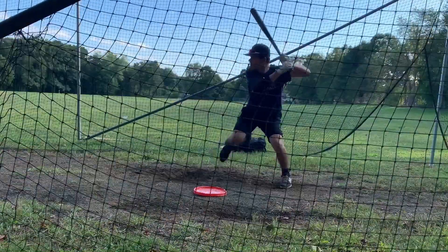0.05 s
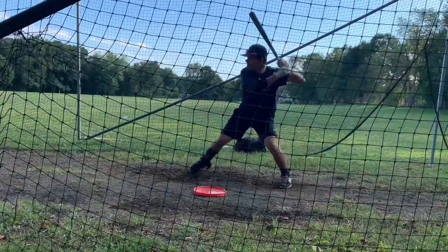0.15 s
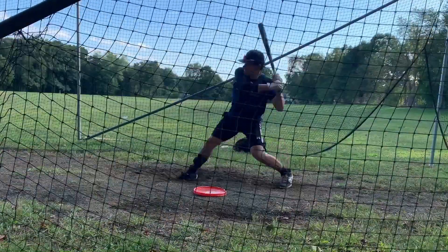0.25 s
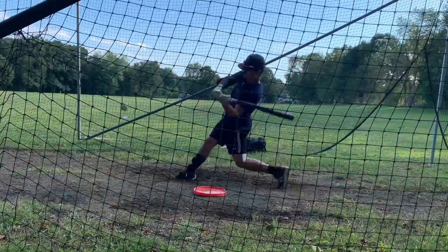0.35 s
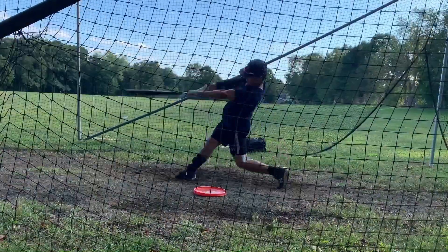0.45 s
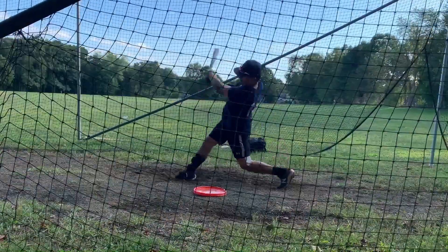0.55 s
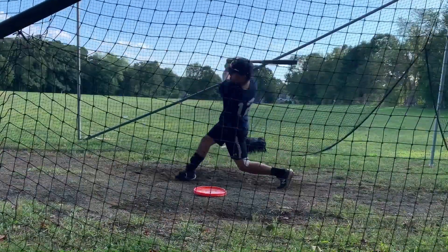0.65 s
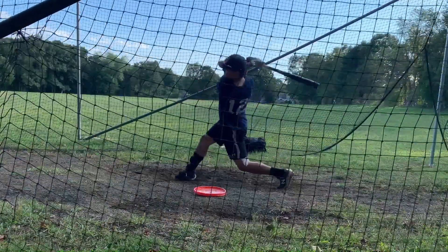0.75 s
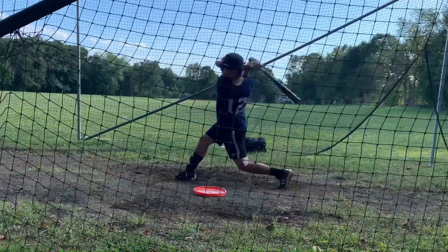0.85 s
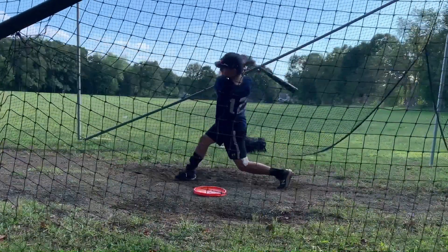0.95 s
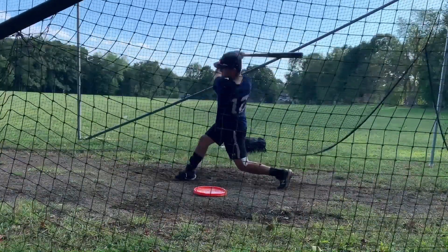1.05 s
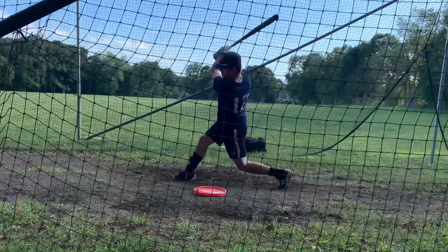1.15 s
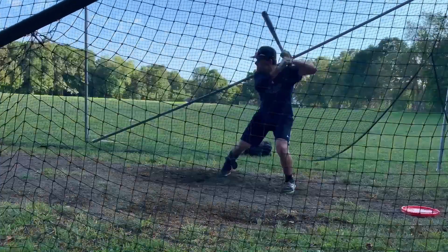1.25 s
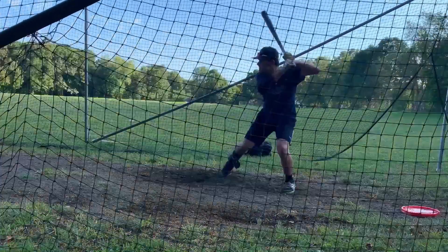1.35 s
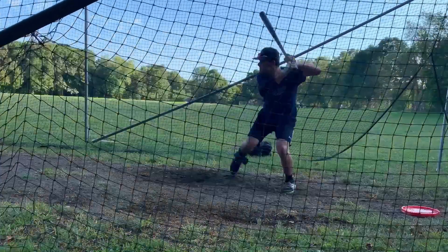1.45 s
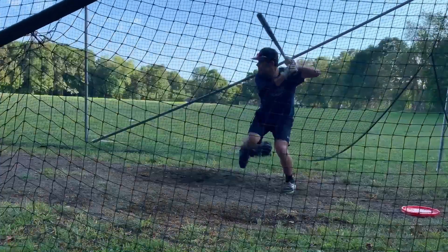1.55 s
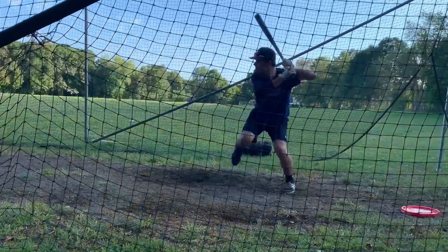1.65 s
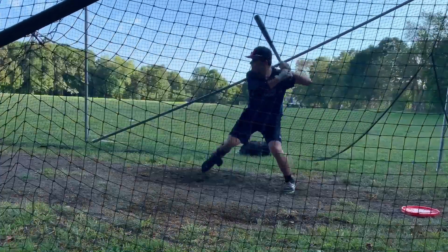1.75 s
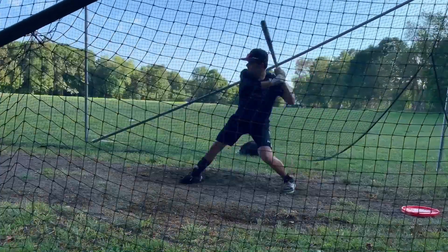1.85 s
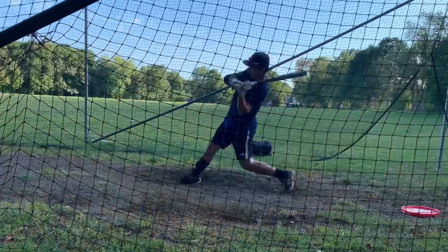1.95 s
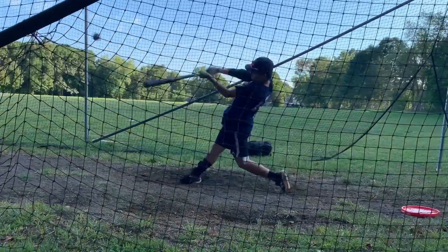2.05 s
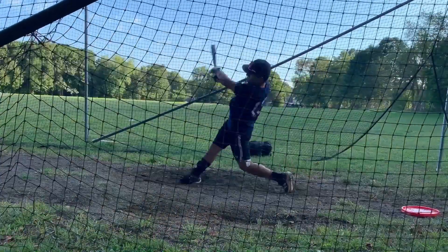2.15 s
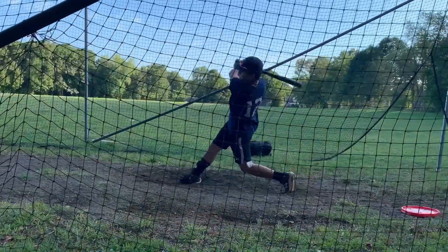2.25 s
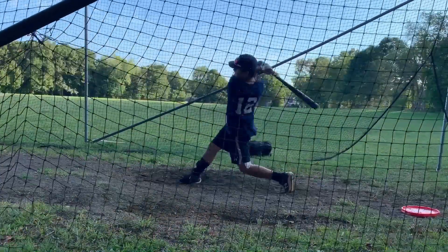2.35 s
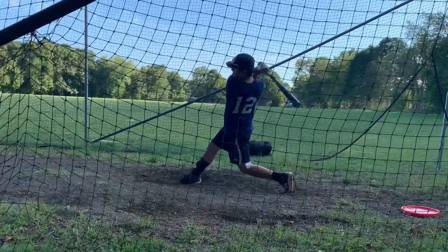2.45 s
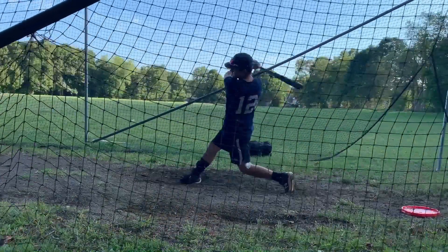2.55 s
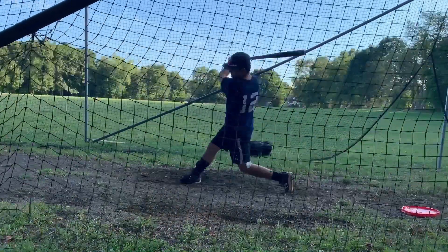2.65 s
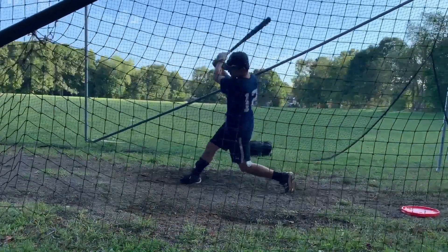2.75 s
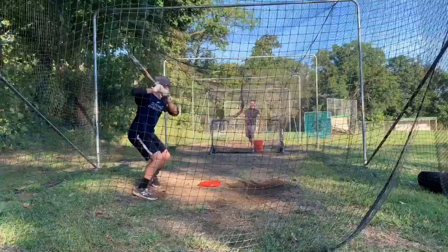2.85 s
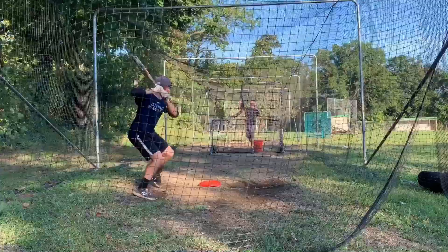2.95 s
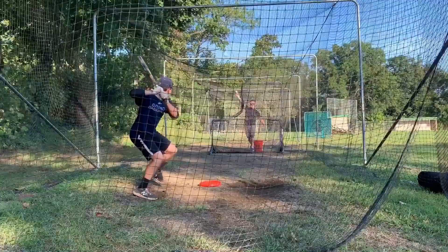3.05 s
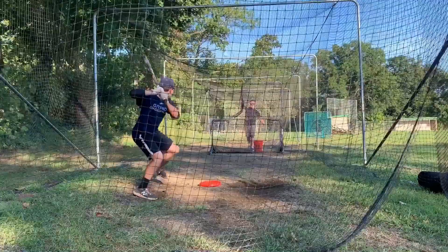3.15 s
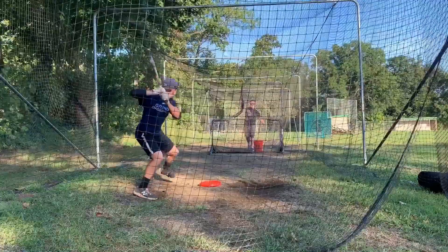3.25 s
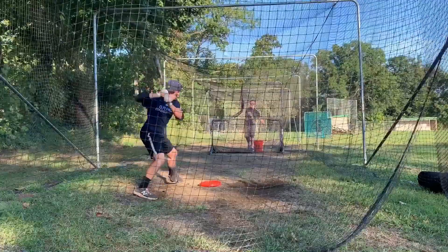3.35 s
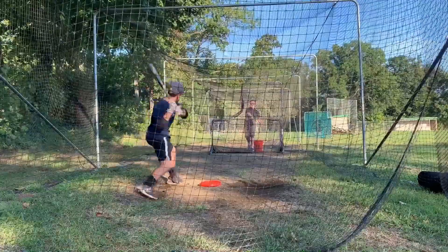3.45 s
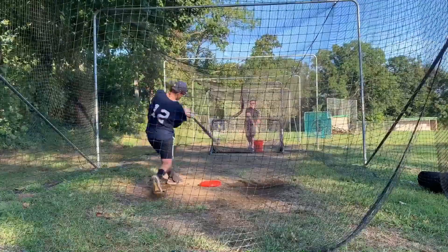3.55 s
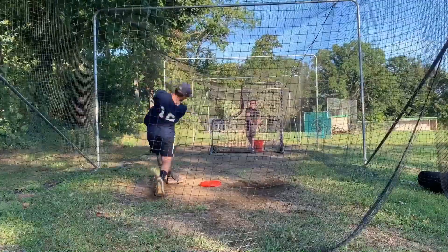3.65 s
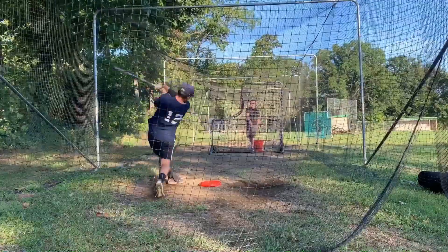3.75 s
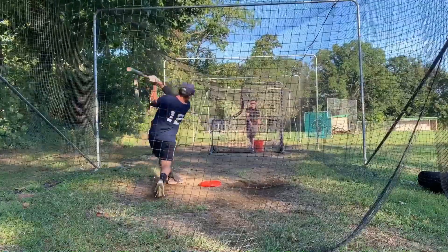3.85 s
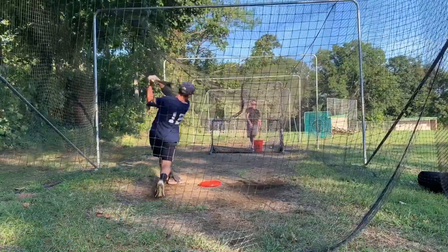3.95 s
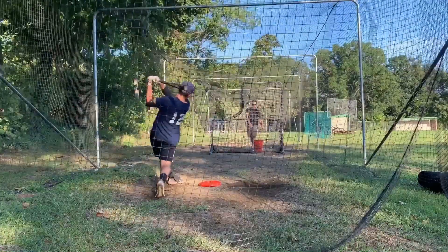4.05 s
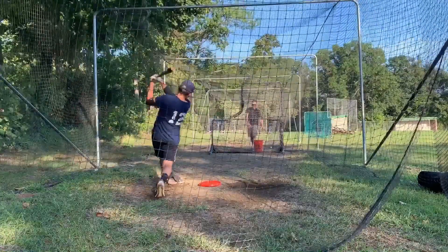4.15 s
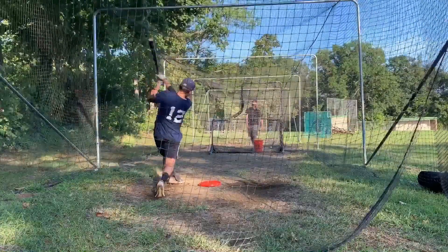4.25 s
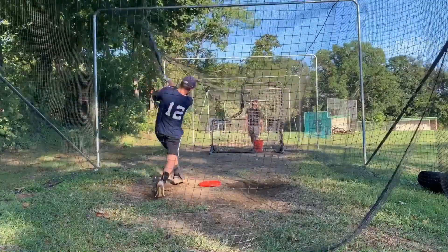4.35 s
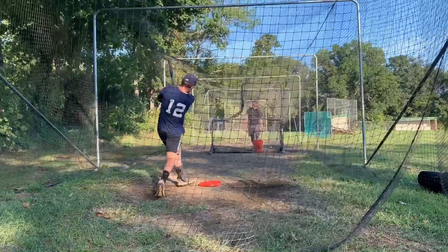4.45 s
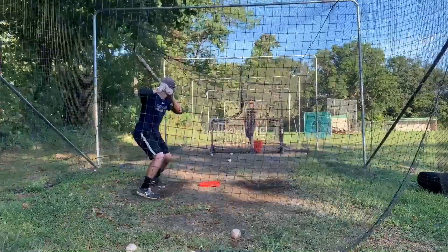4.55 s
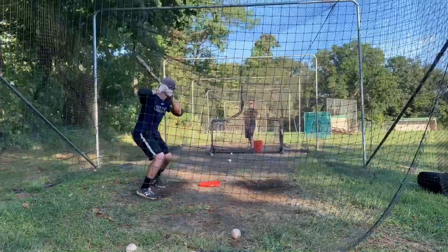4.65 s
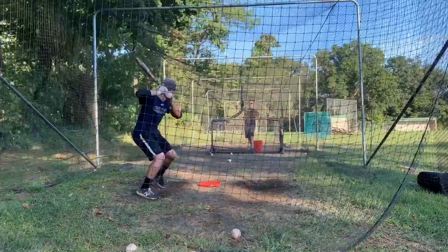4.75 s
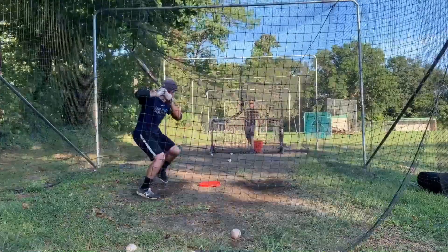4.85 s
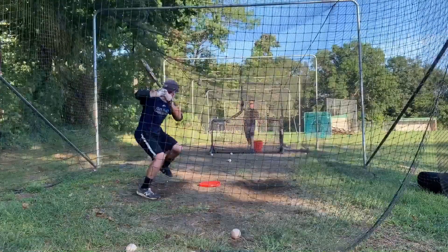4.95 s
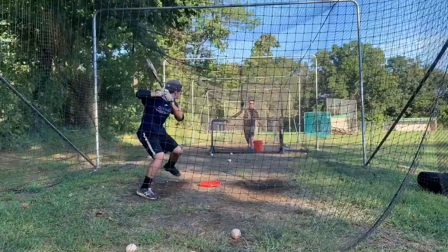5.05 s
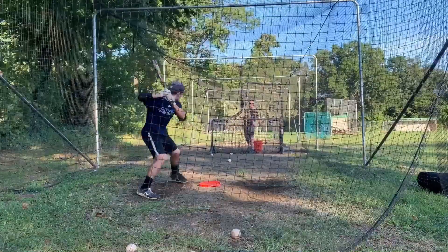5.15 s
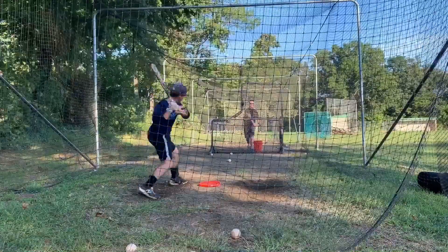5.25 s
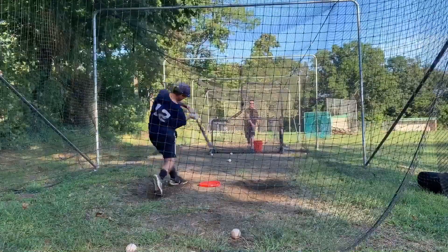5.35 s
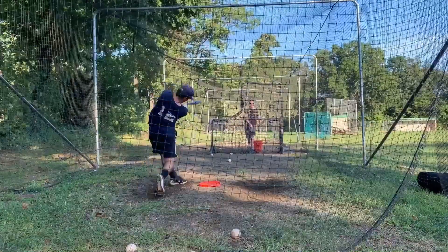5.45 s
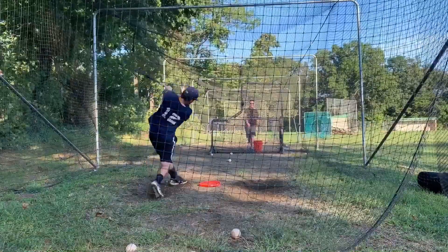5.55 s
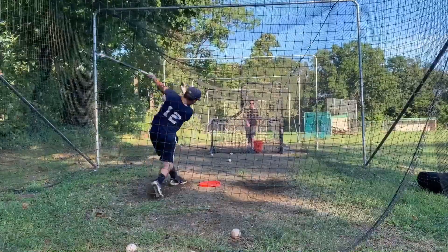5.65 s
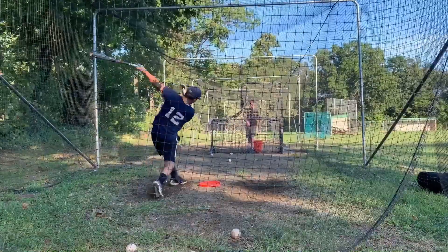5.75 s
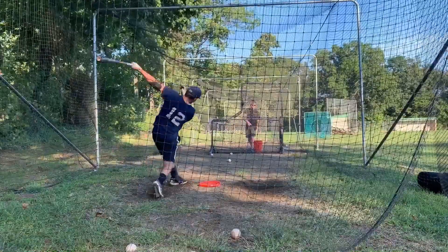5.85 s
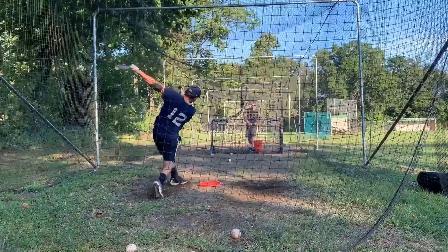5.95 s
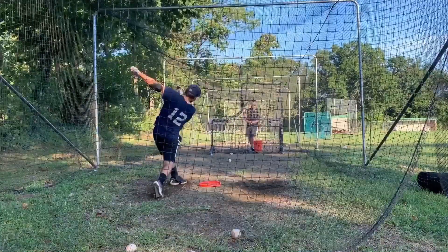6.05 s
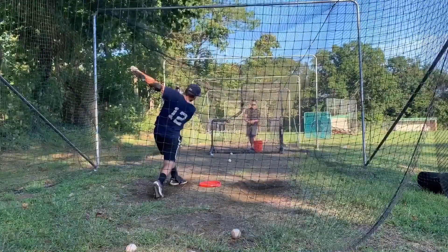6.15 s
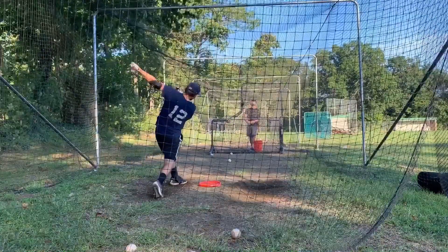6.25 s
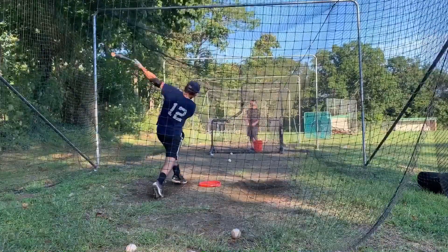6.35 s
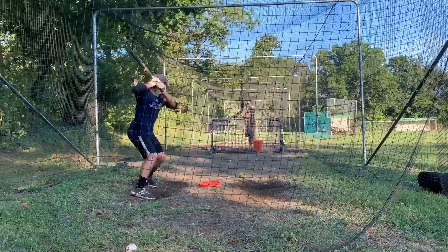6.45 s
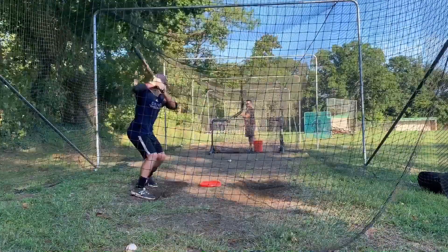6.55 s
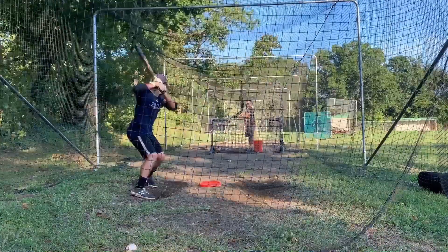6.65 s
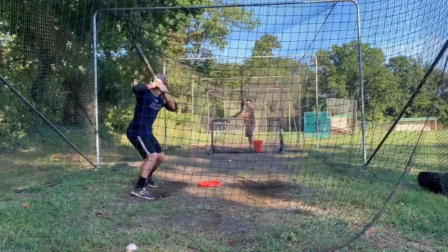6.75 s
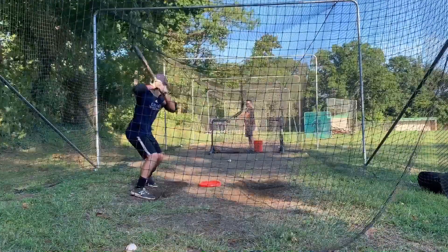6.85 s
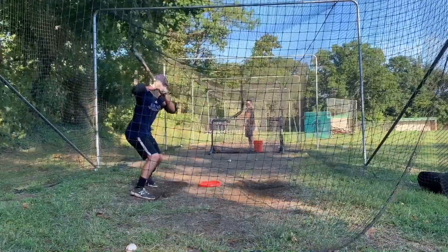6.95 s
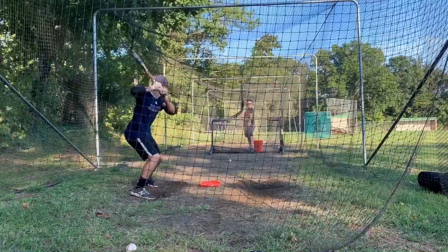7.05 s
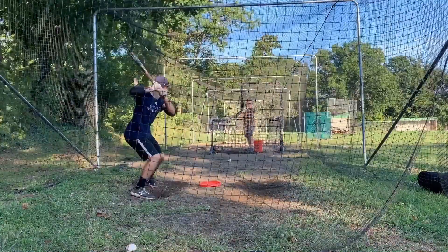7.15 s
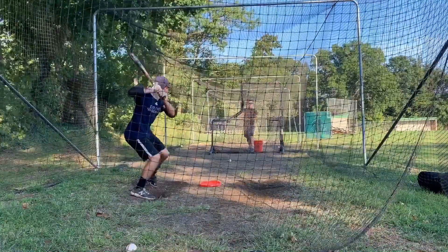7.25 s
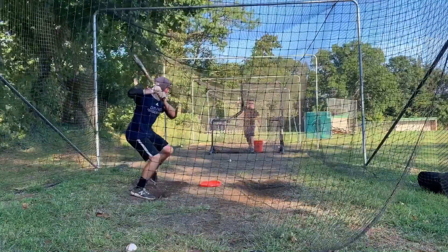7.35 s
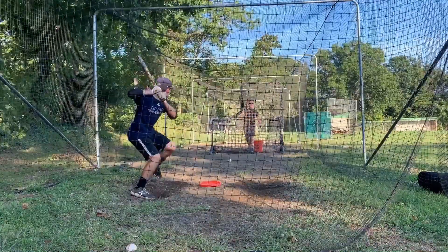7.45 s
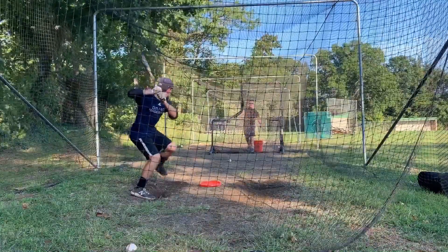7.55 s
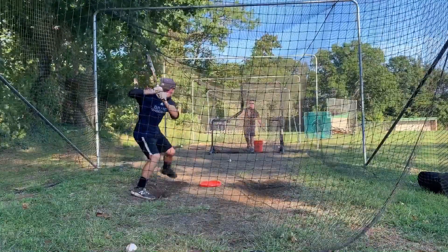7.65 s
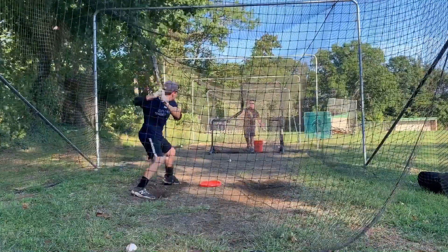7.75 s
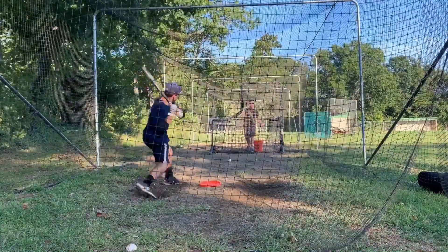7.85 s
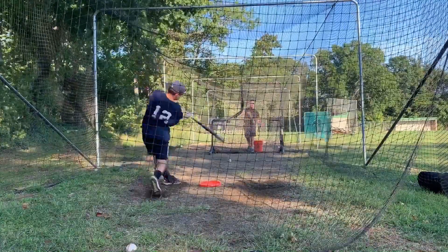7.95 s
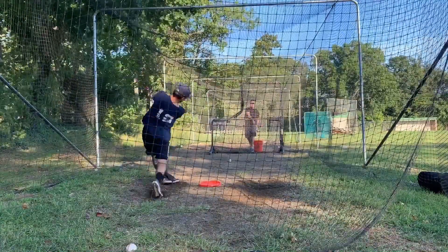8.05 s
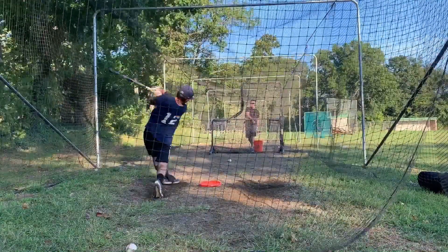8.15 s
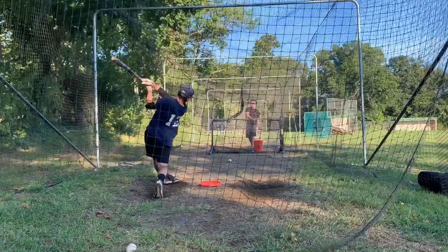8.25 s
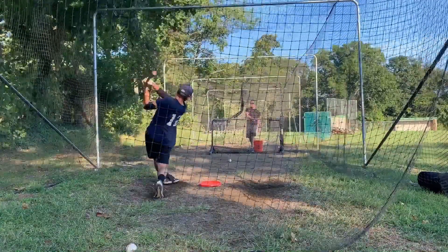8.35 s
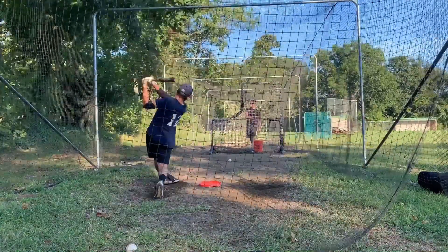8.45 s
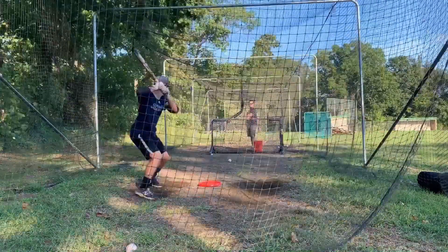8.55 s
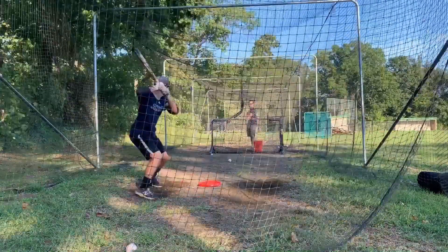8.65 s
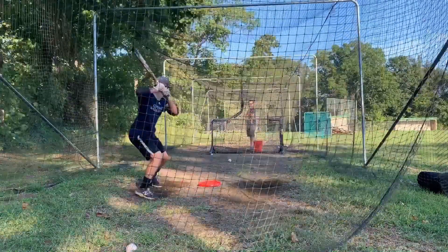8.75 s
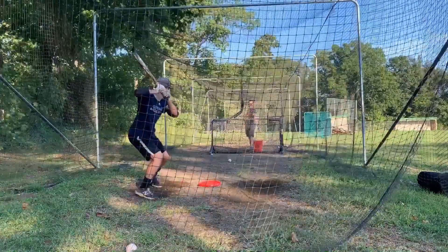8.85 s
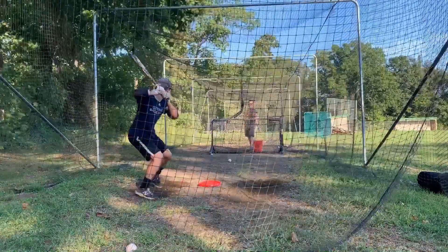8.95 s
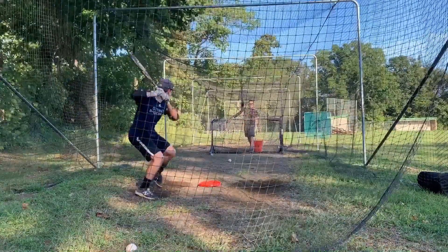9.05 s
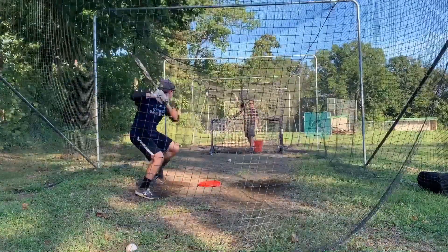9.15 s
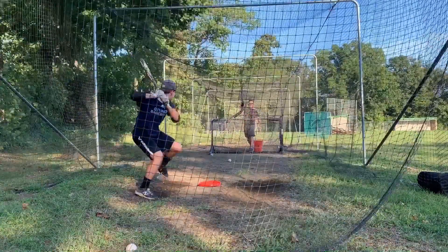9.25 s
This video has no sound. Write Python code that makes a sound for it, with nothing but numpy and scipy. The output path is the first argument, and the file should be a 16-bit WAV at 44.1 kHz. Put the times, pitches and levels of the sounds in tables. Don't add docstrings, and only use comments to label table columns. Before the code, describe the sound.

An open-air batting cage over about 9.3 seconds, with low far traffic, a wavering engine drone, thin high insects and soft leaves. Shoes grind dirt and land at 0.2 s, then a very loud, sharp bat crack hits at 0.4 s with a faint swish; the net slaps and the metal frame tinkles at 0.6 s. The ambience steps at 1.2 s. Heels thud near 1.9 s, the second crack comes at 2.0 s, then net slaps and squeaky rubber chirps around 2.5 s. More scuffs lead to cracks at 3.6 s and 5.4 s, the latter loudest, followed by net slaps at 3.9 s and 5.6 s. A quieter wait runs from 6.4 s until steps at 7.8 s and a fuller, ringing crack at 7.95 s. Each blow trails cord rattle and tree echoes. Leaf hiss rises from 8.5 s. Stereo microphones duck after blows.

```python
import sys
import numpy as np
from scipy import signal
from scipy.fft import rfft, irfft, next_fast_len
from scipy.io import wavfile
from scipy.ndimage import uniform_filter1d

SR = 44100
rng = np.random.default_rng(int(sys.argv[2]) if len(sys.argv) > 2 else 0)


def dump_mix(stems):
    frames = np.atleast_2d(stems).T
    limited = np.clip(frames, -1, 1)
    pcm = np.round(limited * 32767).astype(np.int16)
    wavfile.write(sys.argv[1], SR, pcm)


def decibels_to_gain(level_db):
    exponent = np.asarray(level_db, float) / 20
    return 10 ** exponent


N = 409688
FFT_SIZE = next_fast_len(N)
FFT_HZ = np.fft.rfftfreq(FFT_SIZE, 1 / SR) + 1e-3


def rms_one(x):
    return x / np.sqrt(np.mean(x ** 2) + 1e-20)


def in_time(rows):
    s, *columns = np.transpose(rows)
    return [np.interp(np.arange(N) / SR, s, c) for c in columns]


def at_hz(points, hz):
    p = np.array(points)
    return np.interp(np.log(hz), np.log(p[:, 0]), p[:, 1])


def drift(rate_hz):
    r = np.exp(-80 * np.pi * rate_hz / SR)
    slow = signal.lfilter([1], [1, -2 * r, r * r], rng.standard_normal(N // 40 + 2002))[2000:]
    return np.interp(np.arange(N) / 40, np.arange(len(slow)), rms_one(slow))


# f/Hz, likeness (-1 to 1)
COHERENCE = [(60, 0.87), (250, 0.77), (600, -0.032), (1200, -0.53), (2500, -0.17), (5800, 0.22),
             (6800, 0.72), (8000, 1)]


def coloured(spectrum, source, near=0):
    alike = np.clip(at_hz(COHERENCE, FFT_HZ), -1, 1)
    alike = alike + np.clip(near, 0, 1) * (1 - alike)
    inside = (FFT_HZ >= spectrum[0][0]) * (FFT_HZ <= spectrum[-1][0])
    mid, side = rfft(source, FFT_SIZE) * decibels_to_gain(at_hz(spectrum, FFT_HZ)) * inside
    stereo = np.sqrt(1 + alike) * mid + np.sqrt(1 - alike) * side * [[1], [-1]]
    return rms_one(irfft(stereo, FFT_SIZE)[:, :N])


def noise():
    return rng.standard_normal((2, N))


def grit(per_s, spread_db):
    size = 4.5 * decibels_to_gain(spread_db * np.minimum(rng.exponential(1, N), 3))
    chance = per_s * decibels_to_gain(5.0 * drift(30)) / SR
    return noise() * (1 + size * (rng.random(N) < chance))


def band(x, low_hz, high_hz):
    return signal.sosfilt(signal.butter(2, [low_hz, high_hz], "band", fs=SR, output="sos"), x)


def ring(t, hz, t60):
    return np.sin(2 * np.pi * hz * t) * decibels_to_gain(-60 * np.maximum(t, 0) / t60) * (t > 0)


def swells(peak_s, peak_db, rise_s, t60, lasts=1.2):
    out = np.zeros(N)
    for s, db, rise, fall in np.broadcast(peak_s, peak_db, rise_s, t60):
        i = np.arange(max(round((s - rise) * SR), 0), min(round((s + min(fall, lasts)) * SR), N))
        since = i / SR - s
        out[i] += decibels_to_gain(db + 60 * np.minimum(since / rise, -since / fall))
    return out


def add(out, s, sound):
    i = round(s * SR)
    out[..., i:i + sound.shape[-1]] += sound


# t/s, f/Hz, level/dB
ENGINE = [(0, 100, -70), (.6, 90, -60), (1.17, 95, -61), (1.18, 136, -43.5), (1.7, 138, -49.5),
          (2.25, 139, -38), (2.32, 100, -42), (2.8, 101, -51), (3.3, 104, -45), (4.5, 98, -44.5),
          (4.7, 100, -38), (5.3, 100, -42), (5.9, 101, -39.5), (6.5, 100, -52.5), (7, 92, -43),
          (8.4, 95, -48.5), (8.9, 105, -47), (9.29, 110, -67)]


def engine():
    hz, db = in_time(ENGINE)
    phase = 2 * np.pi * np.cumsum(hz + 2.99 * drift(11.6)) / SR
    return decibels_to_gain(db + 2.56 * drift(12.5)) * np.sin(phase)


# f/Hz, level/dB per Hz
RUMBLE_SPECTRUM = [(13, -59), (22, -23), (29, -54), (40, -5.5), (80, -1), (118, -4.5), (184, -10),
                   (238, -15.5), (362, -28), (420, -46), (550, -94), (920, -120)]
# f/Hz, level/dB per Hz
WASH_SPECTRUM = [(150, -13), (250, -4.5), (667, -8), (717, -3.5), (769, -4), (926, -2), (1970, -15),
                 (5180, -20), (5810, -20.5), (7500, -21.5), (9750, -38.5), (16500, -120)]


def traffic(rumble_db, wash_db):
    rumble = decibels_to_gain(rumble_db + 1 + 2.47 * drift(7.8) + 2.3 * drift(1.5)) * coloured(RUMBLE_SPECTRUM, noise())
    wash = decibels_to_gain(wash_db + 2.5 + 0.82 * drift(1.6)) * coloured(WASH_SPECTRUM, noise())
    return rumble + wash


def insects(level_db):
    hz, width_hz = 5730, 470
    chorus = [(hz - width_hz, -14), (hz, 0), (hz + width_hz, -14)]
    return decibels_to_gain(level_db + 1.6 * drift(9.1)) * coloured(chorus, noise())


# f/Hz, level/dB per Hz
LEAF_SPECTRUM = [(1500, -8.5), (3000, -1.5), (5000, -4), (6300, -4), (7000, -10), (8400, -1.5),
                 (10500, -6.5), (11700, -6.5), (13000, -8.5), (14600, -14.5), (15700, -9), (16300, -46)]


def leaves(level_db):
    hit_s, sway_db = np.transpose(HITS)[0], np.transpose(WAKES)[3]
    sway = swells(hit_s + 0.071, sway_db, 0.3, 4.6, lasts=0.805)
    return np.hypot(decibels_to_gain(level_db), sway) * decibels_to_gain(2.5 + 1.06 * drift(17.0)) * coloured(LEAF_SPECTRUM, noise())


# start t/s, rumble level/dB, road wash level/dB, insect level/dB, leaf level/dB
VIEWS = [
    (0, -45, -49, -60, -66),
    (1.175, -43.5, -51, -58, -71.5),
    (2.82, -44.5, -52.5, -59.5, -74),
    (4.5, -42.5, -49.5, -59.5, -63),
    (6.42, -42.5, -51.5, -59.5, -59),
    (8.51, -44.5, -48.5, -61.5, -51.5),
]


def background():
    start, *levels = np.transpose(VIEWS)
    view = np.searchsorted(start, np.arange(N) / SR, side="right") - 1
    rumble_db, wash_db, insect_db, leaf_db = (level[view] for level in levels)
    return traffic(rumble_db, wash_db) + insects(insect_db) + leaves(leaf_db) + engine()


# f/Hz, level/dB per Hz
DIRT_SPECTRUM = [(88, -25), (150, 1.5), (347, -2), (1650, -9), (4940, -27), (5670, -25), (7200, -27),
                 (9000, -26.5), (11700, -43), (19800, -120)]
# peak t/s, level/dB, 60 dB build-up t/s, T60/s, brightness level/dB
DRAGS = [
    (0.182, -40, 0, 1.6, 0.5),
    (1.91, -41.5, .5, 0.19, -0.5),
    (3.516, -41.5, 0.7, 0.045, -3),
    (3.565, -32, -0.68, 0.022, -10),
    (4.5, -38.5, 0.19, 0.11, -4),
    (5.24, -35, -0.8, .2, -7),
    (5.346, -44.5, 0.7, .07, -6),
    (7.78, -34, 0.07, 0.091, -3),
    (7.85, -49.5, 0.25, 1.1, 2),
]


def strides():
    dirt = coloured(DIRT_SPECTRUM, grit(per_s=600, spread_db=2.5), near=1.0)
    top = band(dirt, 1000, 8500)
    s, db, rise, t60, bright_db = np.transpose(DRAGS)
    longest_s = 0.18
    drag = swells(s, db, rise, t60, longest_s)
    return drag * (dirt - top) + swells(s, db + bright_db, rise, t60, longest_s) * top


# start t/s, hold t/s, level/dB, f/Hz, upper harmonics level/dB
RUBBER = [
    (.015, 0.037, -58, 2010, -17),
    (2.478, 0.023, -41, 2050, -5.5),
    (2.514, .027, -40.5, 2068, -5),
    (2.553, .033, -55, 2060, 4),
    (2.592, 0.027, -59, 2050, -6),
    (2.64, .02, -63, 2060, 1),
    (2.727, .025, -57, 1870, -18),
    (.361, .012, -47, 1680, 6),
    (3.569, .014, -41, 1720, -1),
]


def squeaks():
    out, waver = np.zeros(N), decibels_to_gain(2.0 * drift(66))
    t = np.arange(6000) / SR
    rise_s, t60 = 0.025, 0.03
    for s, held, db, hz, upper_db in RUBBER:
        phase, since = 2 * np.pi * hz * t, t - rise_s
        tone = np.sin(phase) + decibels_to_gain(upper_db) * (np.sin(2 * phase) + 0.39 * np.sin(3 * phase))
        attack = np.minimum(since / rise_s, 0)
        release = (held - since) / t60
        add(out, max(s - rise_s, 0), decibels_to_gain(db + 60 * np.minimum(attack, release)) * tone)
    return np.sqrt(2) * out * waver


def contacts(rows):
    out, t = np.zeros((2, N)), np.arange(3600) / SR
    for s, peak_db, thud_db, hiss_db, t60, hz in rows:
        mid, side = rng.standard_normal((2, 3600))
        fade = decibels_to_gain(-60 * t / t60) * (1 - np.exp(-t / 0.0005))
        puff = (mid + 0.68 * side * np.array([[1], [-1]])) * fade
        knock = 0.8 * ring(t, hz, 9.0 / hz)
        knock = knock - 0.6 * ring(t, hz * 1.9, 8.0 / hz) + 0.4 * ring(t, hz * 3.1, 8.0 / hz)
        slap = 0.52 * band(puff, 420, min(1.9 * hz, 6500)) + 0.97 * band(puff, hz / 1.45, hz * 1.4) + knock
        thud = decibels_to_gain(thud_db) * 7.4 * band(puff, 130, 660)
        hiss = decibels_to_gain(hiss_db) * 1.9 * band(mid * fade, 9100, 16000)
        add(out, s, decibels_to_gain(peak_db - 2.5) * (slap + thud + hiss))
    return out


# t/s, peak level/dB, thud level/dB, knock f/Hz
STEPS = [(.179, -31, -10, 734), (0.294, -28.5, -13, 850), (1.177, -34.5, -2, 850), (1.318, -33.5, 0.5, 750),
         (1.833, -36, -14, 1590), (1.874, -32, 1.5, 1110), (1.911, -24.5, -29, 1110),
         (3.434, -30.5, -3.5, 1000), (3.504, -48, 0, 703), (4.476, -28, -13, 970), (4.502, -24, -5.5, 850),
         (5.217, -39, 4, 720), (5.232, -25, -3.5, 890), (5.343, -45, 9, 700), (5.366, -48, 5, 700),
         (5.499, -38.5, 5, 830), (5.538, -30.5, -3.5, 1410), (7.774, -35, -12, 800), (7.787, -39, -4, 1180),
         (7.859, -26, -5, 1340), (7.934, -24, -1, 626)]


def footfalls():
    hiss_db, t60 = -28, 0.056
    return contacts([(s, db, thud_db, hiss_db, t60, hz) for s, db, thud_db, hz in STEPS])


# t/s, peak level/dB, f/Hz
LANDINGS = [(.262, -25, 226), (1.872, -29, 260), (2.14, -24.5, 300), (7.755, -27, 257), (.603, -27, 505),
            (4.503, -30.5, 315), (3.51, -34, 330), (1.18, -31, 215), (5.34, -29, 450), (5.365, -34, 480),
            (5.538, -35, 500), (5.497, -37, 510)]


def thumps():
    out, t = np.zeros((2, N)), np.arange(16000) / SR
    for s, db, hz in LANDINGS:
        add(out, s, decibels_to_gain(db) * (1 - np.exp(-t * hz)) * ring(t, hz, 17.5 / hz))
    return out


# t/s, peak level/dB, thud level/dB, hiss level/dB, knock f/Hz
NET_SLAPS = [(.602, -23, -6.5, -11, 2520), (2.131, -34, -7, -1, 2870), (2.147, -33.5, -3.5, -16, 3230),
             (2.299, -38, -8, -3, 900), (2.43, -46, -7, -5, 760), (3.865, -22, -20, -30, 4150),
             (5.423, -28, -17, -35, 2430), (5.645, -37, -13, -5, 2070), (2.548, -50, -15, 0, 1500),
             (2.618, -55, -10, -2, 1500), (8.067, -27, -17, -12, 1610), (8.09, -20.5, -13, -18, 970)]


def slaps():
    t60, t60_per_khz = 0.016, 0.019
    return contacts([(*row, t60 + t60_per_khz * hz / 1000, hz) for *row, hz in NET_SLAPS])


# t/s, f/Hz, level/dB, T60/s
FRAME_MODES = [(.606, 2720, -47, 0.24), (.603, 2740, -29.5, 0.06), (.603, 2210, -37, 0.059),
               (.602, 5190, -31, 0.073), (.63, 10200, -48, 0.47), (.63, 13900, -59.5, .4),
               (.72, 9100, -56, 0.072), (.73, 10100, -45, .08), (2.262, 1390, -45, 0.064),
               (5.646, 1300, -41, 0.041), (5.646, 2080, -39, .05), (5.646, 3600, -36, .05)]


def fittings():
    out, t = np.zeros((2, N)), np.arange(16000) / SR
    for s, hz, db, t60 in FRAME_MODES:
        pair = ring(t, hz, t60) + 0.6 * ring(t, hz * 1.011, t60)
        add(out, s, decibels_to_gain(db) * pair)
    return out


# f/Hz, level/dB per Hz
CORD_SPECTRUM = [(6300, 6.5), (7000, -3), (8500, 1.5), (10200, -4), (11700, -6.5), (13000, -6),
                 (14500, -10), (16000, -11), (16600, -42)]
# t/s, rustle level/dB, cage
# rattle level/dB, T60/s
NET_SHAKES = [(0.604, -37, -42, .3), (0.731, -46.5, -60, 0.099), (2.137, -42, -47, 0.6),
              (2.487, -54, -60, .15), (2.523, -60, -53.5, 0.77), (3.39, -57, -58, 0.45),
              (3.456, -77, -50, 0.18), (3.865, -33.5, -41.5, 0.18), (4.159, -60.5, -56, 1),
              (5.648, -38.5, -36.5, 0.053), (8.069, -39.5, -38, 0.32)]
SHAKE_RISE_S = 0.022


def net_cords():
    rustle = coloured(CORD_SPECTRUM, grit(per_s=660, spread_db=3.0))
    delay, _, jolt_db, _ = np.transpose(WAKES)
    s, cords_db, _, t60 = np.transpose(NET_SHAKES)
    jolt = swells(np.transpose(HITS)[0] + delay, jolt_db, 0.078, 0.22)
    return (jolt + swells(s, cords_db, SHAKE_RISE_S, t60)) * rustle


def patchy(x):
    edges = 350 * 2 ** np.arange(0, 5.6, 0.5)
    total = 0
    for k, (low, high) in enumerate(zip(edges, edges[1:])):
        flicker = decibels_to_gain(2.2 * drift(25))
        total = total + band(x, low, high) * flicker * (-1) ** k
    return rms_one(total)


# f/Hz, level/dB per Hz
ECHO_SPECTRUM = [(240, -54), (400, -17.5), (1050, 1), (1270, -1.5), (2280, -3.5), (4650, -4.5),
                 (6390, -17.5), (7230, -56), (7500, -18), (9750, -62), (16500, -120)]
# echo delay t/s, near echo level/dB, cord jolt level/dB, lasting sway level/dB
WAKES = [
    (0.018, -25.5, -32.5, -55.5),
    (0.022, -24, -32, -57.5),
    (0.027, -26.5, -33, -56),
    (.03, -30.5, -34.5, -55.5),
    (0.026, -26.5, -33.5, -52),
]
# peak delay t/s, level/dB, strongest f/Hz, T60/s
TREE_ECHOES = [
    (0.19, -38, 2600, 0.85),
    (0.14, -37, 2630, 0.67),
    (0.16, -37.5, 1950, 0.94),
    (0.17, -35.5, 2350, 0.66),
    (0.18, -40, 2600, 0.85),
]


def reflections():
    echo = patchy(coloured(ECHO_SPECTRUM, grit(per_s=360, spread_db=-2.5), near=0.18)) * decibels_to_gain(0.72 * drift(41))
    hit_s = np.transpose(HITS)[0]
    delay, near_db, _, _ = np.transpose(WAKES)
    s, _, rattle_db, t60 = np.transpose(NET_SHAKES)
    near = swells(hit_s + delay, near_db, 0.073, 0.31)
    out = (near + swells(s, rattle_db, SHAKE_RISE_S, t60)) * echo
    width = 1.32
    for at, (after, db, hz, fall) in zip(hit_s, TREE_ECHOES):
        colour = 0.5 * echo + decibels_to_gain(-3) * band(echo, hz / width, hz * width)
        out = out + swells([at + after], db, 0.58, fall) * colour
    return out


def swing(t, air):
    whoosh = band(air * decibels_to_gain(-60 * np.abs(t + 0.0012) / 0.055), 123, 340)
    swish = band(air * decibels_to_gain(-60 * np.abs(t) / 0.041), 1400, 8200)
    return swish + decibels_to_gain(12) * whoosh


def contact_snap(t, air, hz):
    burst = (0.33 * air + np.cos(2 * np.pi * hz * t)) * decibels_to_gain(-60 * t / 0.0004) * (t > 0)
    return band(burst, hz / 1.7, min(hz * 1.28, 16600))


def bat_body(t, modes):
    body, sign = 0, -1
    for hz, width, db in modes:
        since = t - 0.0004 - 0.53 / hz
        swell = 1 - np.exp(-np.maximum(since, 0) * hz / 0.22)
        sign = -sign
        body = body + sign * decibels_to_gain(db) * width / 200 * swell * ring(since, hz, 2.2 / width)
    return body


# t/s, peak level/dB, snap level/dB, snap f/Hz, swish level/dB
HITS = [
    (0.375, -2.5, -1, 10200, -28),
    (2.0194, -2, -0.5, 10760, -29),
    (3.5840, -2.5, -3, 13300, -31.5),
    (5.3880, -0.5, -0.5, 9200, -42.5),
    (7.947, -1.5, -0.5, 10100, -30.5),
]
# f/Hz, width f/Hz, level/dB
BAT_MODES = [
    [(250, 410, 5), (560, 360, -3.5), (1137, 170, 3), (1800, 330, -21), (2910, 440, -10),
     (4120, 490, -12.5), (5700, 910, -50)],
    [(212, 200, -0.5), (750, 235, 2), (968, 88, 6.5), (1517, 44, 2), (2160, 500, -11), (3200, 690, -20),
     (4580, 930, -26)],
    [(257, 220, 1.5), (587, 400, -14.5), (1104, 190, 2), (1860, 170, -5.5), (2946, 320, -6),
     (4680, 250, -7), (6450, 500, -37)],
    [(240, 240, 8), (680, 88, -2.5), (1115, 170, 3.5), (1660, 340, 6), (2280, 610, -7), (3600, 330, -1),
     (5100, 520, -10)],
    [(278, 160, 13.5), (650, 400, -4), (1155, 250, 13.5), (1650, 180, 11), (2830, 290, 9), (4300, 270, 2),
     (6240, 540, -11)],
]
# delay t/ms, level/dB
GROUND_BOUNCES = [
    (4.28, -13),
    (3.025, -4),
    (1.4, -37),
    (2.01, -15),
    (1.5, -23),
]


def bat():
    out, t = np.zeros((2, N)), np.arange(-1320, 2600) / SR
    for hit, (bounce_ms, bounce_db), modes in zip(HITS, GROUND_BOUNCES, BAT_MODES):
        s, peak_db, snap_db, snap_hz, swish_db = hit
        air = rng.standard_normal((3, len(t)))
        snap = contact_snap(t, air[1], snap_hz)
        body = bat_body(t, modes)
        crush = band(air[2] * decibels_to_gain(-60 * t / 0.09) * (t > 0), 660, 4600)
        direct = decibels_to_gain(snap_db) * snap / np.abs(snap).max() + body / np.abs(body).max() + decibels_to_gain(-19.5) * crush
        dull = band(direct, 38, 4500)
        bounce = decibels_to_gain(bounce_db) * np.interp(t - bounce_ms / 1000, t, dull)
        blow = direct + bounce + decibels_to_gain(swish_db + 12) * swing(t, air[0])
        add(out, s + t[0], decibels_to_gain(peak_db) * blow * decibels_to_gain([[-0.8], [0.8]]))
    return out


def scene():
    ground = strides() + squeaks() + footfalls() + thumps()
    cage = slaps() + fittings() + net_cords()
    return background() + ground + cage + reflections() + bat()


def band_limit(x):
    return signal.sosfilt(signal.butter(12, 16670, fs=SR, output="sos"), x)


# f/Hz, left lead/rad
PORT_LEAD = [(0, 0), (6000, 2.0), (7020, 3.14), (23400, -18.85)]
# f/Hz, left minus right level/dB
PORT_TILT = [(60, 0), (150, -1.5), (380, -0.5), (950, 0), (2380, 0.5), (5980, -2), (15000, 1.5)]


def record(dry):
    port = decibels_to_gain(at_hz(PORT_TILT, FFT_HZ) / 2) * np.exp(0.5j * np.interp(FFT_HZ, *np.transpose(PORT_LEAD)))
    x = irfft(rfft(dry, FFT_SIZE) * [port, 1 / port], FFT_SIZE)[:, :N]
    limit_db, recover_db_per_s = -22, 73
    ramp = recover_db_per_s * np.arange(N) / SR
    level = 10 * np.log10(uniform_filter1d(np.mean(x ** 2, axis=0), size=220) + 1e-12)
    held = np.maximum.accumulate(level + ramp) - ramp
    over = np.maximum(held - limit_db, 0)
    r = np.exp(-1 / (0.036 * SR))
    duck_db = signal.lfilter([1 - r], [1, -r], -0.7 * over)
    bass = signal.lfilter(*signal.butter(1, 300, fs=SR), x)
    x = (x - bass) * decibels_to_gain(duck_db) + bass * decibels_to_gain(1.7 * duck_db)
    x = np.clip(x, -0.9, 0.9)
    x = signal.sosfilt(signal.cheby2(10, 60, 17150, fs=SR, output="sos"), x)
    return band_limit(x)


dry = scene()
out = record(dry)
dump_mix(out)
```